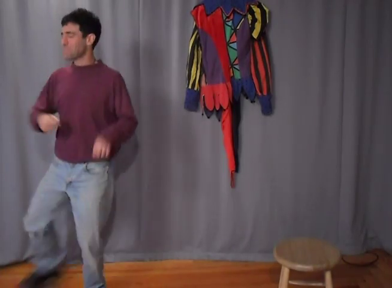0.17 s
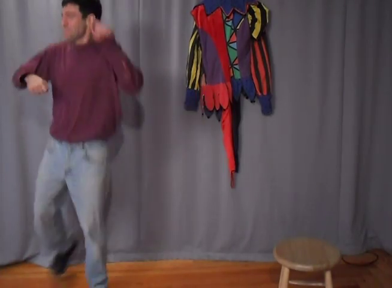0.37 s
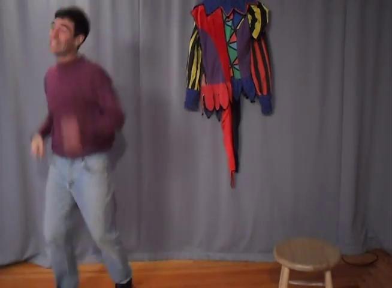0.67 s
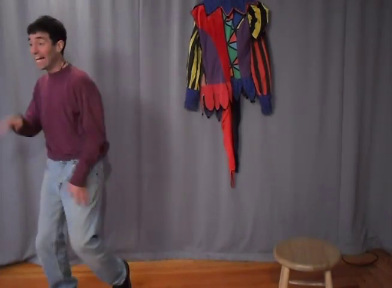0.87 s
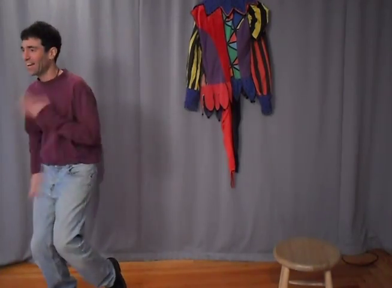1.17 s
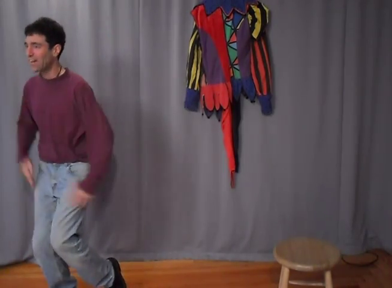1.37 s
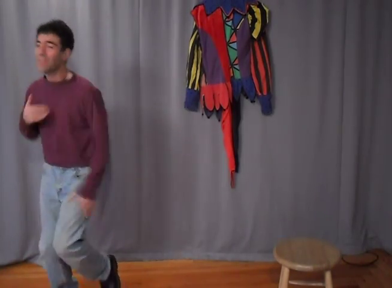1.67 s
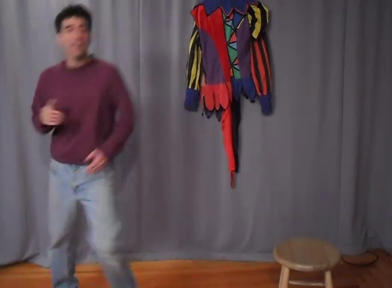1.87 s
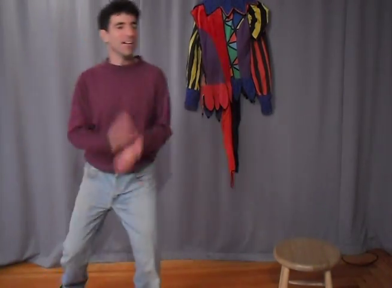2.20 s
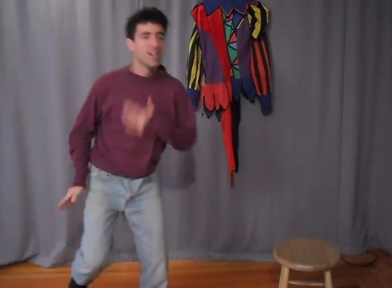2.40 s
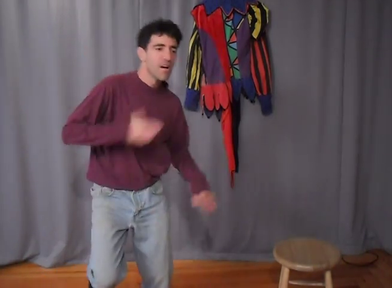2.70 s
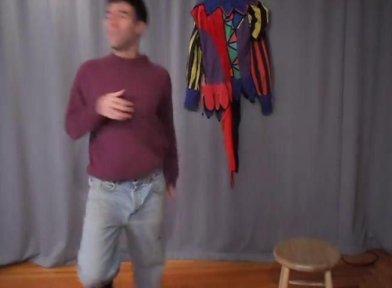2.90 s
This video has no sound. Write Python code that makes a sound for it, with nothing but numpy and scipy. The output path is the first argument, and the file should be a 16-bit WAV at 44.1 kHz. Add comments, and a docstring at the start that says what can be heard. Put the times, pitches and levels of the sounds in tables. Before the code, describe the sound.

Hard-soled shoes dance on a wooden floor in a small room. A light scuff opens, then three stomps land by 0.3 seconds, the first with a bright slap. The heaviest landings boom at about 0.6 and 0.7 seconds, with another slap. Lighter, uneven taps run from 1.1 to 2.9 seconds, with a deep thump near 2 and a brief scuff at 2.5. Faint room noise lies underneath.

```python
"""A light scuff, then a dancer's hard-soled shoes stomp and tap on a wooden floor in a small curtained room.
Each footfall is a short contact of the sole that rings the boards and scatters round the room.
Landings set the whole floor booming on its joists; two flat slaps leave a bright ring.
Faint room noise lies underneath."""
import sys
import numpy as np
from scipy import signal
from scipy.fft import rfft, irfft
from scipy.io import wavfile
from scipy.ndimage import uniform_filter1d

SR = 44100
rng = np.random.default_rng(int(sys.argv[2]) if len(sys.argv) > 2 else 0)


def master(y):
    """Save y as 16-bit WAV."""
    cut = np.clip(np.atleast_2d(y).T, -1, 1)
    pcm = np.round(cut * 32767)  # scale
    wavfile.write(sys.argv[1], SR, pcm.astype(np.int16))


N = 134505

# room noise spectrum (frequency [Hz], relative density [dB])
NOISE_SPECTRUM = [(12, -24), (20, -2.5), (70, -21.5), (237, -31), (307, -30), (1220, -36), (1540, -42.5),
                  (2160, -36), (2330, -39), (9250, -45.5), (10000, -50), (13000, -71), (22000, -120)]
# early reflections (delay [s], gain [linear])
REFLECTIONS = [(.0042, .8), (.0095, 0.26), (0.014, 0.39), (0.017, 0.34)]
# room decay (frequency [Hz], T60 [s])
ROOM_DECAY = [(60, 0.85), (200, .4), (500, 0.46), (1200, 0.41), (2200, 0.44), (3300, .38), (5000, 0.36),
              (10000, .27)]
# curtains absorb treble from the scattered sound (frequency [Hz], gain [dB])
CURTAIN_EQ = [(100, 1), (1000, 2), (2500, -2), (5000, -2.5), (10000, -4.5)]
# brushes of sole on wood (time [s], length [s], level [dB])
SOLE_SCUFFS = [(0.0, 0.022, -45), (.475, 0.067, -71), (1.514, 0.041, -50), (1.896, 0.025, -49.5),
               (2.488, 0.043, -48.5), (2.534, 0.018, -37.5)]
# scuff colour (frequency [Hz], relative gain [dB])
SCUFF_EQ = [(100, -4), (300, 2.5), (600, -6.5), (2000, -8), (4500, -16), (10000, -27.5)]
# weight coming down on the floor (time [s], level [dB], push length [s])
WEIGHT_LANDINGS = [(.006, -33.5, 0.0054), (.122, -21.5, 0.0053), (.234, -22.5, 0.0068),
                   (0.332, -30.5, 0.0068), (0.635, -14, 0.012), (0.733, -12.5, 0.015), (.828, -24.5, 0.01),
                   (1.205, -37.5, 0.0096), (1.379, -38, 0.005), (1.625, -33.5, 0.0072),
                   (1.994, -20.5, 0.014), (2.04, -18.5, 0.012), (2.294, -55, 0.034), (2.859, -38, 0.0073)]
# modes of the floor on its joists (frequency [Hz], relative level [dB], T60 [s])
JOIST_MODES = [(32.16, -11.5, 0.82), (40.7, -5.5, 0.24), (53.4, -7.5, 0.25), (79.8, -4.5, 0.28),
               (106.7, -2, 0.19), (157, -8, 0.21)]
# room rumble after a landing (frequency [Hz], relative gain [dB])
RUMBLE_EQ = [(10, -33.5), (25, -5), (45, 1), (110, -7), (170, 0.5), (300, -18), (1000, -56.5)]
# room ring after a flat slap (time [s], centre [Hz], level [dB])
SLAP_RINGS = [(.115, 2240, -34), (.719, 2080, -34.5)]
# board resonances at the struck spots (time [s], frequency [Hz], level [dB], T60 [s])
BOARD_MODES = [(.114, 475, -28.5, 0.15), (.116, 148, -33.5, 0.56), (0.226, 213, -32.5, .14),
               (.228, 324, -23.5, 0.23), (0.293, 182, -19.5, 0.081), (.329, 230, -28, 0.28),
               (.329, 722, -33.5, 0.17), (0.612, 222.6, -20, 0.091), (0.615, 343, -22, 0.086),
               (.613, 471, -20.5, 0.13), (.725, 168, -30, 0.31), (1.195, 506, -31, 0.31),
               (1.369, 524, -33, 0.18), (1.700, 510, -38, 0.13), (1.700, 1231, -26.5, 0.12),
               (1.986, 113, -28, .3), (2.012, 159.7, -31, 0.25), (2.340, 471, -34.5, 0.27),
               (2.548, 473, -32, 0.21), (2.548, 579, -30, 0.21), (2.848, 469, -27, 0.13),
               (2.848, 785, -39, 0.3)]
# sole contacts (time [s], thud [dB], knock [dB], clack [dB], slap [dB], snap [dB], roll [s], settle [s])
FOOTFALLS = [(0.1139, 1.5, 2, -0.6, 4, -19, 0.00025, 0.0029),
             (0.2262, 11, -0.5, -4.5, -6.5, -13.5, 0.0017, 0.0012),
             (0.3277, .5, 2, -11.5, -9.5, -8.5, 0.0011, 0.0028),
             (0.612, 9.5, 3.5, 3, -4, -16.5, 0.00056, 0.01),
             (.717, -2.5, -3.5, -3, -2.5, -8, 0.00044, .002),
             (.814, -23, -14.5, -19.5, -23, -22, 0.00093, .002),
             (1.1201, -20.5, -4.5, -14, -10, -7.5, 0.0049, 0.0058),
             (1.1922, -13.5, 0, -4, -5, -5.5, .0037, 0.0015), (1.366, -8, -1.5, -1.5, -6, -9, .004, 0.0051),
             (1.610, -12.5, -6, -4.5, -10.5, -14.5, 0.0031, 0.0064),
             (1.697, -15.5, 0, -5, -9.5, -13, 0.0061, 0.0036),
             (1.971, -6, -11, -13.5, -16.5, -22.5, 0.000964, 0.021),
             (2.009, -8, -10, -16, -17.5, -28, 0.0064, 0.015),
             (2.251, -15.5, -7.5, -12, -10, -8, .0025, 0.0024),
             (2.3375, -13, -3, -5, -6.5, -11, 0.0025, 0.0025),
             (2.545, -11, -7.5, -7.5, -14, -15, 0.0044, 0.0055),
             (2.7803, -8, -9, -14, -16.5, -22.5, 0.00094, 0.0052),
             (2.8463, -14, -5, -3.5, -8.5, -10.5, 0.0031, 0.0085)]
# footfall bands, thud to snap (frequency [Hz])
FOOTFALL_BANDS_HZ = [230, 540, 1130, 2400, 6800]
# colour common to all footfalls (frequency [Hz], gain [dB])
SHOE_EQ = [(20, -28.5), (45, -8), (100, -0.5), (160, 2), (230, 3.5), (330, 2.5), (395, 0), (490, -0.5),
           (630, -3), (820, -2), (1100, -2.5), (1700, -3.5), (2400, -5.5), (3300, -7), (4300, -10.5),
           (6200, -14), (8000, -17.5), (10000, -23.5)]


def amp(db):
    return 10 ** (np.asarray(db) / 20)


def decay(t, t60_s):
    return amp(-60 * t / t60_s)


def unit_energy(x):
    return x / np.sqrt(np.sum(x ** 2) + 1e-20)


def curve_at(points, hz):
    """Interpolate on a log-frequency axis."""
    points_hz, values = np.transpose(points)
    return np.interp(np.log(hz + 1), np.log(points_hz + 1), values)


def add(mix, start_s, sound):
    part = mix[max(round(start_s * SR), 0):][:len(sound)]
    part += sound[:len(part)]


def colour(x, eq, size=8192):
    """Minimum-phase filter from points (frequency [Hz], gain [dB])."""
    log_gain = np.log(amp(curve_at(eq, abs(np.fft.fftfreq(size, 1 / SR)))))
    response = np.exp(np.conj(signal.hilbert(log_gain)))
    taps = np.fft.ifft(response).real[:size // 2]
    return signal.fftconvolve(x, taps)[:len(x)]


def whiten(x, width_bins=161):
    """Flatten the broad spectrum; keep fine peaks and dips."""
    hz = np.fft.rfftfreq(len(x), 1 / SR)
    power = uniform_filter1d(abs(rfft(x)) ** 2, width_bins)
    return colour(x, np.transpose([hz, -10 * np.log10(power + 1e-12)]))


def velvet(count, slot_samples=8):
    """Sparse noise: one tap of random sign per slot."""
    taps = np.zeros(count)
    slots = np.arange(0, count - slot_samples, slot_samples)
    taps[slots + rng.integers(0, slot_samples, len(slots))] = rng.choice([-1., 1.], len(slots))
    return taps


def room_noise(rms_db=-52.5):
    """Steady rumble and hiss."""
    gain = amp(curve_at(NOISE_SPECTRUM, np.fft.rfftfreq(N, 1 / SR)))
    noise = irfft(rfft(rng.standard_normal(N)) * gain, N)
    return amp(rms_db) * np.sqrt(N) * unit_energy(noise)


def room_response(t, early_db=7, early_t60_s=0.2, late_db=5, build_s=0.0017, delay_spread=0.1):
    """Path from one spot on the floor: direct sound, reflections, quick scatter, longer tail."""
    build = 1 - np.exp(-t / build_s)
    hz, frame_s, spectra = signal.stft(velvet(len(t)), SR, nperseg=256)
    spectra *= decay(frame_s, curve_at(ROOM_DECAY, hz)[:, None])
    late = signal.istft(spectra, SR, nperseg=256)[1][:len(t)]
    early = velvet(len(t)) * decay(t, early_t60_s)
    scattered = amp(early_db) * unit_energy(early * build) + amp(late_db) * unit_energy(late * build)
    path = colour(scattered, CURTAIN_EQ)
    path[0] += 1  # direct sound
    for delay_s, gain in REFLECTIONS:
        shift = 1 + delay_spread * rng.uniform(-1, 1)  # the dancer moves about
        path[round(delay_s * shift * SR)] += gain
    return path


def scuff(length_s, level_db, grain_spread_db=4):
    """A sole brushes the wood: a short swell of grains in the room."""
    t = np.arange(SR // 2) / SR
    swell = np.sin(np.pi * np.minimum(t / length_s, 1))
    grains = velvet(len(t)) * amp(grain_spread_db * rng.exponential(1, len(t))) * swell
    heard = signal.fftconvolve(grains, room_response(t))[:len(t)]
    return amp(level_db) * np.sqrt(length_s * SR) * unit_energy(colour(heard, SCUFF_EQ))


def floor_boom(level_db, push_s, rumble_db=-8, rumble_t60_s=0.5):
    """A soft push of body weight swings the low floor modes; the room rumbles after it."""
    t = np.arange(SR) / SR
    push = np.sin(np.pi * np.minimum(t / push_s, 1))
    swing = sum(amp(db) * decay(t, t60_s) * np.cos(2 * np.pi * hz * t) for hz, db, t60_s in JOIST_MODES)
    rumble = np.sqrt(SR) * unit_energy(colour(velvet(len(t)), RUMBLE_EQ)) * decay(t, rumble_t60_s)
    response = swing + amp(rumble_db) * rumble
    return amp(level_db) * signal.fftconvolve(push / push.sum(), response)[:len(t)]


def slap_ring(centre_hz, level_db, width_hz=540, t60_s=0.45):
    """A dense cluster of room modes dies away after a flat slap."""
    t = np.arange(SR * 3 // 4) / SR
    hz = np.fft.rfftfreq(len(t), 1 / SR)
    band = np.exp(-((hz - centre_hz) / width_hz) ** 2)
    cluster = irfft(rfft(velvet(len(t))) * band, len(t))
    return amp(level_db) * np.sqrt(len(t)) * unit_energy(cluster) * decay(t, t60_s)


def board_ring(hz, level_db, t60_s, rise_s=0.0072):
    """A struck floorboard rings briefly at its own pitch."""
    t = np.arange(SR // 2) / SR
    envelope = (1 - np.exp(-t / rise_s)) * decay(t, t60_s)
    return amp(level_db) * envelope * np.sin(2 * np.pi * hz * t)


def footfall(thud_db, knock_db, clack_db, slap_db, snap_db, roll_s, settle_s, gain_db=16, grit_gain=0.52):
    """The sole touches, rolls flat with a sharp strike and settles grittily, heard through the room."""
    t = np.arange(SR * 3 // 4) / SR
    contact = np.exp(-abs(t - roll_s) / settle_s)
    grit = velvet(len(t)) * rng.exponential(1, len(t)) * contact
    force = grit_gain * unit_energy(grit)
    force[round(roll_s * SR)] += 1  # sole lands flat
    heard = whiten(signal.fftconvolve(force, room_response(t))[:len(t)])
    step_eq = list(zip(FOOTFALL_BANDS_HZ, [thud_db, knock_db, clack_db, slap_db, snap_db]))
    return -amp(gain_db) * colour(colour(heard, step_eq), SHOE_EQ)


def scene():
    """Footwork over room noise, mono."""
    mix = room_noise()
    layers = [(footfall, FOOTFALLS), (board_ring, BOARD_MODES), (slap_ring, SLAP_RINGS),
              (floor_boom, WEIGHT_LANDINGS), (scuff, SOLE_SCUFFS)]
    for source, events in layers:
        for start_s, *settings in events:
            add(mix, start_s, source(*settings))
    return mix[None]


def record(dry, cutoff_hz=10050):
    """Steep low-pass."""
    taps = signal.firwin(301, cutoff_hz, window=("kaiser", 9), fs=SR)
    return signal.oaconvolve(dry, taps[None], "same")


dry = scene()
out = record(dry)
master(out)
```